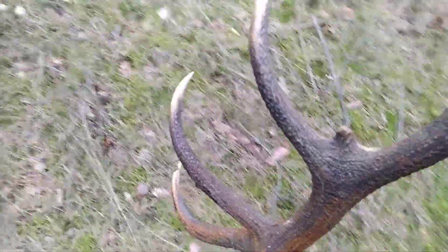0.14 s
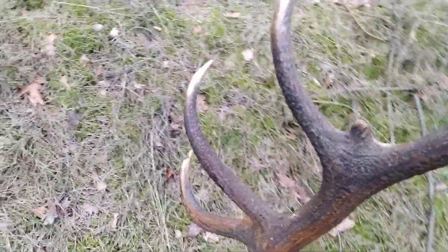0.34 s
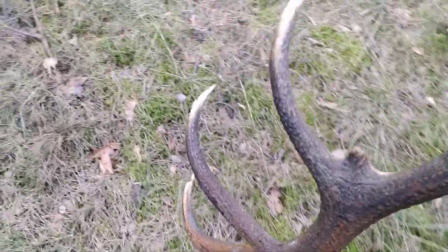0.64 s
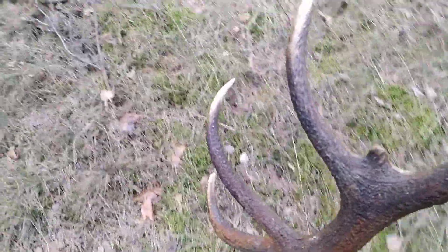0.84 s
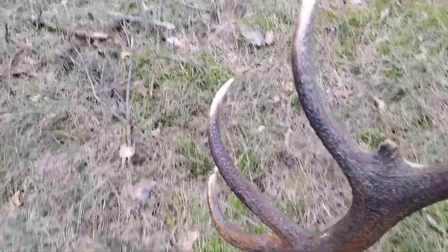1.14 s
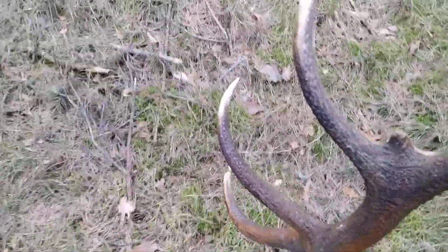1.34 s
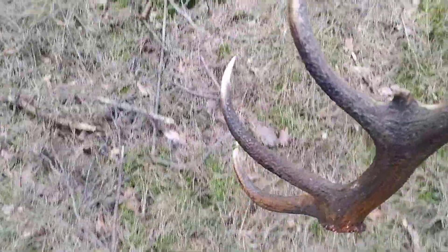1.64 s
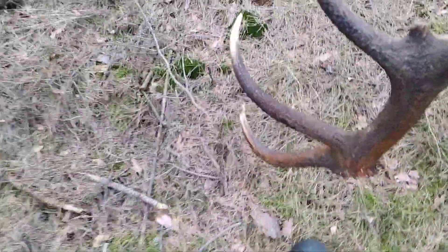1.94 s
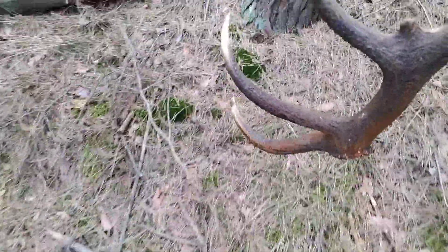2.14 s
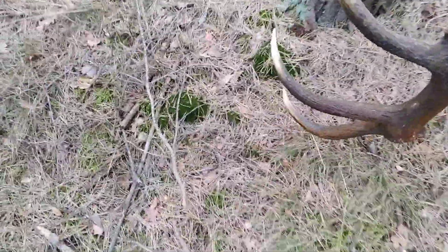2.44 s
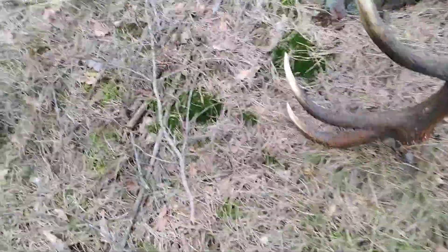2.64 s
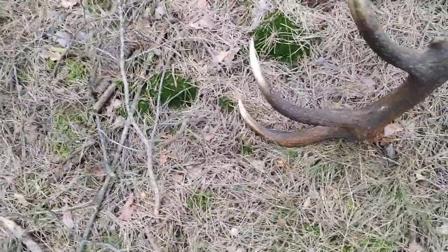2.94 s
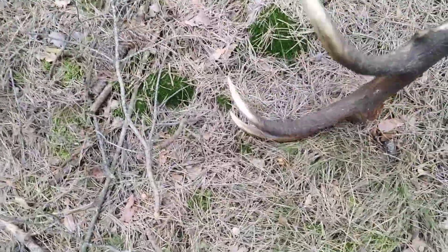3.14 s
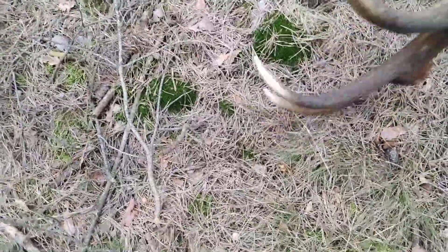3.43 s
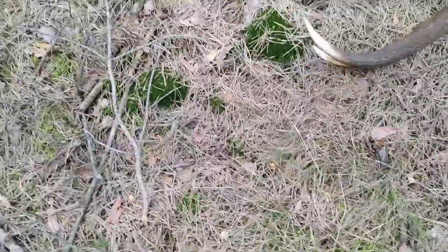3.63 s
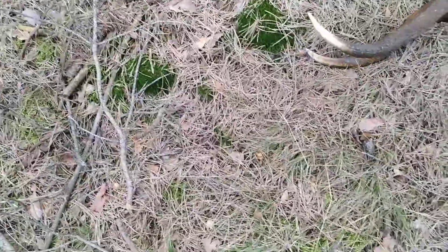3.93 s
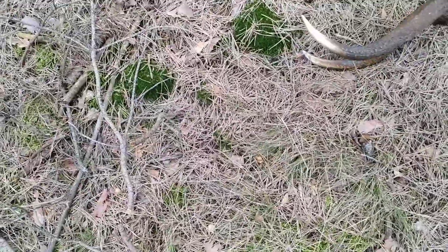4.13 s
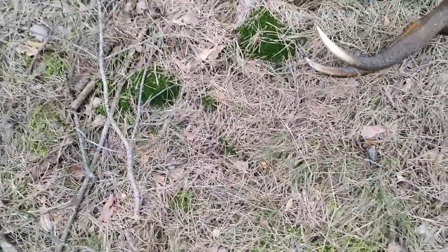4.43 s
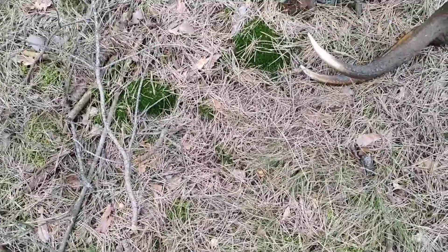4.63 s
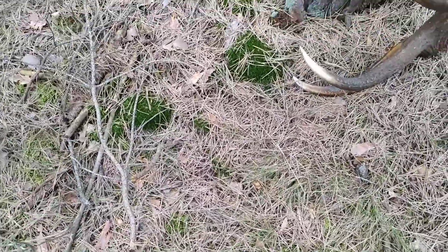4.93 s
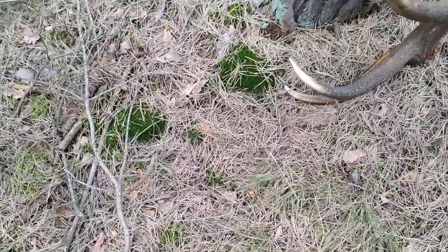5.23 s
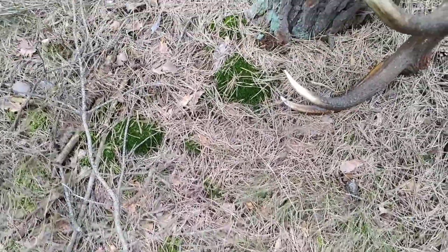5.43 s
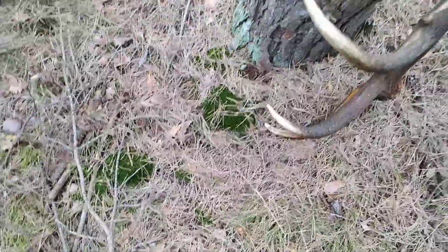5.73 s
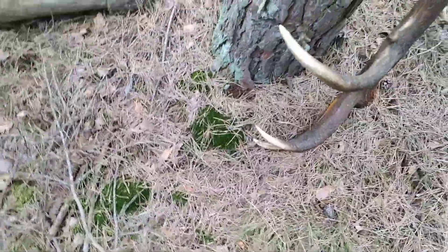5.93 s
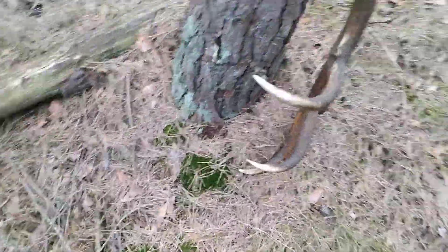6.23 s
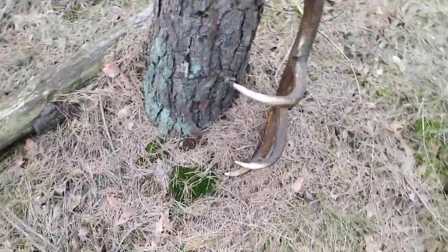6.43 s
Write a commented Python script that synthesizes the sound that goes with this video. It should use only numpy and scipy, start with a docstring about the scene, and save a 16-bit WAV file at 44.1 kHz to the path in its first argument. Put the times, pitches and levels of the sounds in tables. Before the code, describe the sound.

Someone walks slowly on a forest floor of dry needles and grass. Bright, brittle crackling comes in uneven bursts with swishing stems and sharp little twig snaps, along with faint dull heel thuds. The steps quieten around five seconds, then resume, and a hard knock bumps the handheld phone near the end. A faint low breeze sits behind, outdoors and dry, with the stereo leaning left.

```python
"""Crackling and snaps run throughout, uneven in strength, as a walker with a phone treads dry needles
and grass. Each press of the boot makes bursts of tiny breaks: bright needles, swishing stems, a duller
crunch. Twigs snap as short noise bursts, heels thud as low falling tones, and one knock hits the phone.
Behind it all a faint breeze rumbles, as filtered noise, on two microphone ports that ring near 9 kHz."""
import sys
import numpy as np
from scipy import signal
from scipy.fft import rfft, irfft, next_fast_len
from scipy.io import wavfile
from scipy.ndimage import uniform_filter1d

SR = 44100
rng = np.random.default_rng(int(sys.argv[2]) if len(sys.argv) > 2 else 0)


def transcribe(u):
    """Save the signal u as a 16-bit wav file named by the first command-line argument.

    u: samples, shape (n,) or (channels, n), limited to [-1, 1]; the rate is SR.
    q: integer samples, one column per channel.
    """
    v = np.clip(np.atleast_2d(u).T, -1, 1)
    q = np.round(v * 32767).astype(np.int16)
    wavfile.write(sys.argv[1], SR, q)


N = 289888

# Levels and left-right balances in all tables hold before the ports colour the sound.
# Breeze and forest hush, tone: (frequency [Hz], relative level [dB])
AIR_TONE = [(7.1, -25), (12, 0.5), (70, -21.5), (85, -22.5), (222, -24), (439, -28), (796, -40.5),
            (999, -46.5), (10500, -56.5), (13600, -99), (22000, -120)]
# Heel thuds: (time [s], level [dB], starting pitch [Hz], time for the ring to fall 60 dB [s])
HEEL_THUDS = [(0.128, -33.5, 400, 0.012), (0.712, -37, 490, 0.015), (0.733, -43.5, 343, 0.036),
              (2.151, -44, 600, 0.016), (2.197, -35, 376, 0.021), (2.401, -39, 374, 0.021),
              (3.525, -48.5, 230, 0.031), (3.961, -39.5, 254, 0.15), (3.962, -46.5, 70, 0.12),
              (3.97, -49, 355, 0.28), (3.985, -47, 154, 0.15), (6.043, -41.5, 424, 0.036),
              (6.243, -38, 340, 0.019)]
# Knock beside the left port: (shove level [dB], ring level [dB], settled pitch [Hz],
# time for the ring to fall 60 dB [s], right port relative to left [dB])
CASE_KNOCK = (-11, -22.5, 142, 0.1, -22)
# Snapping twigs and needles: (time [s], body [dB], wood [dB], edge [dB], crack [dB], top [dB],
# left minus right [dB]); each level is the rms of that part's energy spread over 2 ms
TWIG_SNAPS = [(0.0443, -40, -50, -49, -52, -75.0, -3), (0.1252, -42.5, -42, -32.5, -34.5, -50, -8),
              (0.545, -55, -51, -37, -31, -52, -15.0), (0.618, -62, -60, -56, -38.5, -58, -10),
              (0.711, -43.5, -62, -47.5, -41, -48, -13), (0.727, -51, -56, -43, -43, -54, -11),
              (0.767, -47.5, -62, -36, -28.5, -54, -19), (0.841, -54.5, -68.0, -58.0, -41.5, -69, -6),
              (0.8751, -67, -65, -58, -39, -65, -6), (1.058, -79, -64.0, -55, -50, -66.0, -6),
              (1.0927, -44, -42.0, -31, -24.5, -35, -3.5), (1.1122, -55, -53, -53, -50, -58, -2.5),
              (1.1543, -61, -54.5, -58, -48, -59.0, -4.0), (1.419, -44.5, -55, -37, -38, -45.0, -3.5),
              (1.4538, -42.5, -45, -45, -44, -42, -3.5), (1.5199, -40, -67, -39.5, -38, -52, -3),
              (1.888, -53, -54, -47, -39, -54, -9), (2.042, -44, -55, -42, -42, -54, -9),
              (2.0622, -45, -55, -43, -31, -48, -9), (2.4992, -55, -50.0, -33.5, -34, -58, -9),
              (2.548, -63, -55.0, -50, -38, -62.0, -10), (3.037, -58, -58, -52, -47, -60, -11),
              (3.21, -58, -61, -41.5, -39, -58, -10), (3.3648, -59, -69, -47, -51, -59.0, -14),
              (3.953, -57, -50, -46, -36, -52, 9), (3.9556, -53, -38.5, -31.5, -27, -42, 2),
              (3.9952, -63.0, -50, -36, -28.5, -48, 6), (4.0187, -68, -40.5, -40, -44, -54, -2.5),
              (4.0861, -55, -44, -34.5, -35, -44, -2), (4.2793, -69, -87, -43, -47, -81, -25),
              (4.4559, -56, -37.5, -32, -30.5, -47, -1), (4.5131, -57, -46, -33.5, -37, -53, -5),
              (4.6833, -69, -64, -57, -54, -69, -6), (4.9615, -80.0, -61.5, -59, -44, -67, 7),
              (5.511, -76, -88.0, -59.0, -61, -87.0, -15), (6.1898, -54, -50, -35, -27, -44, 1),
              (6.1923, -46, -47, -24.5, -22, -44, -21), (6.3792, -32.5, -28, -21, -22, -27, 3),
              (6.4636, -40.5, -38, -32, -25, -32, -0.5), (6.4984, -40.5, -47, -54.0, -38, -52, -2),
              (6.5345, -41, -56, -50, -35, -53, -4)]
# Edges between a snap's body, wood, edge, crack and top bands: (frequency [Hz])
SNAP_BAND_EDGES = (500, 2000, 4500, 7500, 11000, 16000)
# Boot presses or drags; rise and fall are the times for a 20 dB change:
# (start [s], rise [s], hold [s], fall [s], needle crackle [dB],
# grass stems relative to crackle [dB], sole crunch relative to crackle [dB])
BOOT_PRESSES = [(0.0, 0.0059, 0.073, 0.3, -60.5, -12, -2.5), (0.491, 0.097, 0.0046, 0.3, -47.5, -6, -8.5),
                (0.976, 0.12, 0.03, 0.073, -60.5, -16, -15), (1.127, 0.073, 0.099, 0.35, -63, 5, 3.5),
                (1.16, 0.18, .005, 0.057, -46, -11, -11.5), (1.353, 0.09, 0.0043, 0.056, -47, -2, -11),
                (1.356, 0.18, .005, 0.13, -55, -2.5, -4), (1.824, 0.013, 0.054, 0.11, -51, -9, -9),
                (1.916, 0.13, .005, 0.077, -41, -7, -12), (1.999, 0.14, 0.072, 0.38, -48, -5.5, -8.5),
                (2.458, 0.053, 0.0085, 0.26, -45, -6.5, -18), (2.497, 0.16, 0.33, 0.14, -51, -9.5, -14.5),
                (2.701, 0.11, 0.0048, 0.071, -40, -13.5, -24),
                (2.917, 0.35, 0.19, 0.91, -53.5, -11.5, -13.5),
                (3.787, 0.034, 0.031, 0.046, -39.5, -9, -18), (3.856, 0.15, 0.0041, 0.11, -47, -4.5, -13),
                (3.957, 0.24, 0.16, 0.31, -63, -12.5, -9.5),
                (4.408, 0.057, 0.0044, 0.099, -53.5, -6.5, -34),
                (4.657, 0.26, 0.007, 0.22, -65, -1.5, -10.5), (5.505, 0.32, .005, 0.34, -58, -2.5, -3),
                (6.01, 0.048, 0.14, 0.33, -47, -8, -10.5), (6.052, 0.09, 0.025, 0.1, -48.5, -10, -5.5),
                (6.444, 0.05, .2, .2, -48, -6, -5.5)]
# Litter settling between presses: (time [s], needle crackle [dB], grass stems [dB], sole crunch [dB])
LITTER_SETTLING = [(0.0, -61.5, -63, -71.5), (0.35, -73.5, -73.5, -66.5), (1.0, -81, -71.5, -69),
                   (1.7, -68, -70.5, -68), (4.3, -83, -70.5, -71), (4.601, -86, -89, -88),
                   (5.05, -70, -80, -75), (5.352, -91.5, -85, -84.5), (5.55, -84, -90, -83),
                   (6.57, -77, -58, -61)]
# Where the crackle sits: (time [s], left minus right [dB], needle tips relative to crackle [dB])
CRACKLE_PLACE = [(0.0, -7, -20), (0.84, -9, -14), (1.3, -5.5, -15), (1.77, -8, -17.5), (3.81, -7.5, -16),
                 (4.209, -6.5, -34), (5.6, -6.5, -23), (6.31, -7, -14), (6.57, -5, -17)]
# Tones of breaking needles, grass stems and sole crunch: (frequency [Hz], relative level [dB])
NEEDLE_TONE = [(2000, -28), (4000, -19.5), (5500, -8), (7000, -4), (9000, -5), (10800, -11.5),
               (12000, -15.5), (16000, -33.5)]
STEM_TONE = [(700, -19), (1500, 2), (2200, 1), (3200, -1.5), (5000, -6), (6500, -2.5), (9000, -34.5)]
SOLE_TONE = [(60, -45.5), (170, -1), (350, -0.5), (800, -3), (1400, -6.5), (2500, -23.5)]
# Difference in tone between the two ports: (frequency [Hz], left minus right [dB])
PORT_TONE = [(60, 5.5), (200, 7.5), (700, 5), (1290, 2.5), (2380, 8.5), (8120, 3), (15000, 5.5)]

AIR_DB = -62
KNOCK_S = 6.382
RIGHT_LAG, LEFT_LAG = -12, 8  # samples by which the right or the left port hears a sound late
SNAP_SIDE_DB = -3.2  # snaps with a left minus right above this reach the right port last
CRACK = 2  # size of the sharp crack added to the noise of the fibres
TAIL_DB, TAIL_S, SPLINTERS_PER_S = -21, 0.005, 300
NEEDLE_BREAK_S, STEM_BREAK_S, SOLE_BREAK_S = 0.005, 0.007, 0.016  # fall of one break by 60 dB
BED, LARGEST_DB = 0.55, 9  # share of power in the smooth bed; cap on the size of one break
SURGE_DB = 2.2  # wavering of crackle, stems and crunch
TICKS_PER_S, TICK_DB = 24, 6  # smallest peak, relative to the crackle
PORT_HZ, PORT_WIDTH_HZ, PORT_DB = 8960, 900, 3.5
TOP_HZ = 16500


def undb(db):
    """Turn decibels into a plain gain."""
    return 10 ** (np.asarray(db) / 20)


def unit(x):
    """Scale to an rms of 1."""
    return x / np.sqrt(np.mean(x ** 2))


def colour(x, points):
    """Filter through (frequency [Hz], gain [dB]) points, without sounding ahead of time."""
    size = next_fast_len(x.shape[-1] + 4096)
    size += size % 2
    hz, db = np.transpose(points)
    f = np.arange(size // 2 + 1) * SR / size
    log_gain = np.interp(np.log(f + 1), np.log(hz), db) * np.log(10) / 20
    # folding the cepstrum moves the whole response to after the input
    cepstrum = irfft(log_gain, size)
    cepstrum[1:size // 2] *= 2
    cepstrum[size // 2 + 1:] = 0
    response = np.exp(rfft(cepstrum))
    return irfft(rfft(x, size) * response, size)[..., :x.shape[-1]]


def pair(likeness, count=N):
    """Make left and right noise with the given correlation."""
    c = np.clip(likeness, 0, 1)
    mid, side = rng.standard_normal((2, count))
    shared, opposed = np.sqrt(1 + c) * mid, np.sqrt(1 - c) * side
    return np.array([shared + opposed, shared - opposed]) / np.sqrt(2)


def band(x, lo_hz, hi_hz):
    """Keep mainly the sound between two frequencies."""
    return signal.sosfilt(signal.butter(3, [lo_hz, hi_hz], "bandpass", fs=SR, output="sos"), x)


def walk(rate):
    """Wander smoothly between random levels, rate of them a second, with a spread near 1."""
    hold = int(SR / rate)
    steps = np.repeat(rng.standard_normal(N // hold + 1), hold)
    return uniform_filter1d(steps, hold)[:N]


def grains(per_s, t60, spread_db):
    """Loudness curve of random breaks, many small and few large, over a smooth bed; power near 1."""
    when, size = rng.random(N), rng.exponential(size=N)
    power = (when < per_s / SR) * undb(2 * np.minimum(size * spread_db, LARGEST_DB))
    fall = np.exp(-2 * np.log(1000) / (t60 * SR))
    # two smoothing steps: each break swells briefly before it dies
    env = signal.lfilter([1], [1, -fall ** 2], power)
    env = signal.lfilter([1], [1, -fall], env)
    local_mean = uniform_filter1d(env, size=SR // 4) + 1e-12
    return np.sqrt(BED + (1 - BED) * env / local_mean)


def add(out, s, x):
    """Mix x into out from time s."""
    i = int(s * SR)
    out[:, i:i + x.shape[1]] += x[:, :N - i]


def sides(pan_db):
    """Left and right gains for a balance given as left minus right in dB."""
    return undb(np.array([pan_db, -pan_db]) / 2)


def lagged(x, lag):
    """Delay the left by lag samples, or the right if lag is negative."""
    return np.array([np.roll(x[0], max(lag, 0)), np.roll(x[1], max(-lag, 0))])


def air():
    """Breeze and far forest hush: noise swelling a little, mostly unrelated at the two ports."""
    swell = undb(2.0 * walk(3.96))
    return undb(AIR_DB) * unit(colour(pair(0.31) * swell, AIR_TONE))


def thuds():
    """The soil gives a short, low ring of falling pitch and a dull grind under each heel."""
    out, t = np.zeros((2, N)), np.arange(SR // 5) / SR
    onset = 1 - np.exp(-t / 0.0015)
    for s, db, hz, t60 in HEEL_THUDS:
        ring = np.sin(2 * np.pi * hz * t * (1 - 0.4 * t))
        fall = np.exp(-np.log(1000) * t / t60)
        grind = undb(-5.0) * unit(band(pair(0.92, count=len(t)), 118, 610))
        add(out, s, undb(db) * onset * (ring * fall + grind * np.exp(-t / 0.0036)))
    return out


def knock():
    """The blow shoves the left membrane in and it swings slowly back; the case rings, dropping in pitch."""
    shove_db, ring_db, hz, t60, right_db = CASE_KNOCK
    out, t = np.zeros((2, N)), np.arange(SR // 4) / SR
    swing = np.exp(-t / 0.017) - 0.37 * np.exp(-t / 0.044)
    shove = (1 - np.exp(-t / 0.0042)) * swing
    # the second term starts the pitch high and lets it drop within milliseconds
    turns = hz * t + 1.75 * (1 - np.exp(-t / 0.002))
    fall = np.exp(-np.log(1000) * t / t60)
    ring = np.cos(2 * np.pi * turns) * fall * (1 - np.exp(-t / 0.000053))
    blow = -(undb(shove_db) * shove + undb(ring_db) * ring)
    add(out, KNOCK_S, blow * undb([[0], [right_db]]))
    return out


def snaps():
    """Fibres tear in a brief burst with a crack; the stick's body answers later, then splinters."""
    out, t = np.zeros((2, N)), np.arange(2048) / SR
    burst = (t / 0.0005) ** 2 * np.exp(2 - 2 * t / 0.0005)
    late = (t / 0.001) ** 2 * np.exp(-t / 0.0012)
    for s, *levels_db, pan_db in TWIG_SNAPS:
        lag = RIGHT_LAG if pan_db > SNAP_SIDE_DB else LEFT_LAG
        fibres = pair(0.75, count=len(t))
        fibres[:, 22] += CRACK  # at the peak of the burst
        hits = 1.0 * (rng.random(len(t)) < SPLINTERS_PER_S / SR)
        splinters = uniform_filter1d(hits, size=40) * 80
        tail = undb(TAIL_DB) * (0.5 + splinters) * np.exp(-t / TAIL_S) * (t > 0.001)
        for k, db in enumerate(levels_db):
            # the body (k = 0) comes late, and at both ports together
            shape = burst + tail if k else late
            part = band(shape * fibres, *SNAP_BAND_EDGES[k:k + 2]) * sides(pan_db)[:, None]
            part = lagged(part, lag if k else 0)
            rms = np.sqrt(np.sum(part ** 2) / 4 / (SR // 1000))  # two ports, 2 ms
            add(out, s, undb(db) * part / rms)
    return out


def tread(t):
    """Gains of crackle, stems and crunch: presses rise, hold and fall, adding power to the settling."""
    s, *columns = np.transpose(LITTER_SETTLING)
    power = np.array([undb(2 * np.interp(t, s, c)) for c in columns])
    for start, rise, hold, fall, db, stem_db, sole_db in BOOT_PRESSES:
        rising = np.minimum((t - start) / rise - 1, 0)
        falling = (start + rise + hold - t) / fall
        shape_db = 20 * np.minimum(rising, falling)
        layers_db = np.array([[0], [stem_db], [sole_db]])
        power = power + undb(2 * (db + shape_db)) * undb(2 * layers_db)
    return np.sqrt(power)


def ticks():
    """Lone needles spring free now and then, each a tiny noise burst at its own high pitch."""
    out, t = np.zeros((2, N)), np.arange(256) / SR
    for when, pitch, size in rng.random((int(TICKS_PER_S * N / SR), 3)):
        hz = 7500 * 1.4 ** pitch
        puff = t * np.exp(-t / 0.00087) * pair(0.27, count=len(t))
        tick = band(puff, hz / 1.38, hz * 1.23)
        add(out, when * N / SR, undb(TICK_DB + 5 * size) * tick / abs(tick).max())
    return out


def litter():
    """Needles break in bright grains, grass stems a little lower; the sole adds a duller crunch."""
    t = np.arange(N) / SR
    crackle, swish, crunch = tread(t)
    s, *columns = np.transpose(CRACKLE_PLACE)
    pan_db, tips_db = (np.interp(t, s, c) for c in columns)
    fine = grains(700, NEEDLE_BREAK_S, 3.1)
    medium = grains(450, STEM_BREAK_S, 2.5)
    coarse = grains(150, SOLE_BREAK_S, 4.3)

    needles = unit(colour(fine * lagged(pair(0.12), LEFT_LAG), NEEDLE_TONE))
    tips = unit(band(np.sqrt(fine) * pair(0.076), 11500, 16000))
    tips = undb(tips_db + 2.1 * walk(69)) * tips
    # the same breaks spill into the neighbouring layers
    stems = unit(colour((fine / 2 + medium) * lagged(pair(0.28), LEFT_LAG), STEM_TONE))
    sole = unit(colour((0.45 * medium + coarse) * pair(0.59), SOLE_TONE))

    bright = crackle * undb(SURGE_DB * walk(40)) * (needles + tips + ticks())
    bright = bright + swish * undb(SURGE_DB * walk(30)) * stems
    dull = crunch * undb(SURGE_DB * walk(25)) * sole
    return bright * sides(pan_db) + dull


def scene():
    """Add all layers, from the background to the litter underfoot."""
    return air() + thuds() + knock() + snaps() + litter()


def record(dry):
    """The ports differ in tone and ring in the treble; a steep filter cuts the top."""
    left = colour(dry[0], [(hz, 0.5 * db) for hz, db in PORT_TONE])
    right = colour(dry[1], [(hz, -0.5 * db) for hz, db in PORT_TONE])
    ports = np.array([left, right])
    ring = signal.lfilter(*signal.iirpeak(PORT_HZ, PORT_HZ / PORT_WIDTH_HZ, fs=SR), ports)
    top_cut = signal.ellip(10, 0.2, 75, TOP_HZ, fs=SR, output="sos")
    return signal.sosfilt(top_cut, ports + undb(PORT_DB) * ring)


dry = scene()
out = record(dry)
transcribe(out)
```